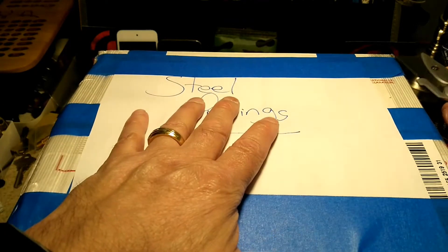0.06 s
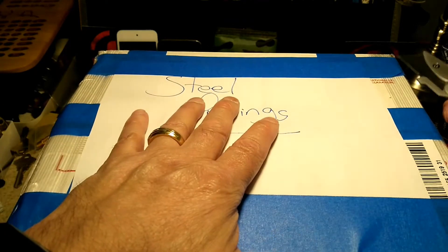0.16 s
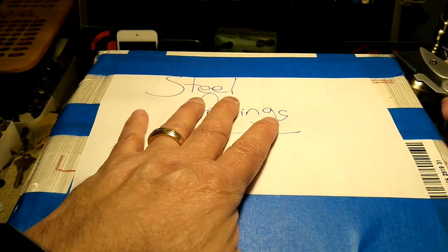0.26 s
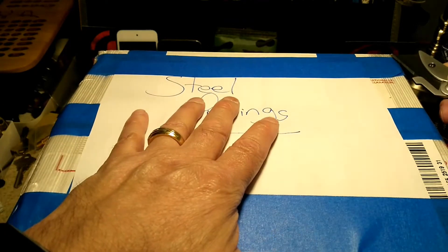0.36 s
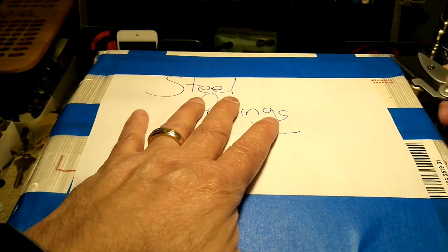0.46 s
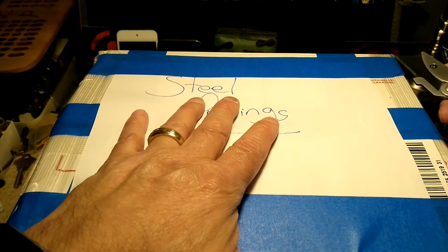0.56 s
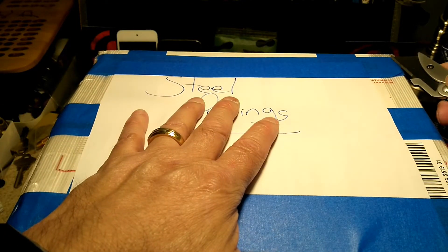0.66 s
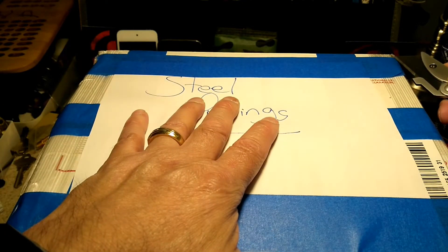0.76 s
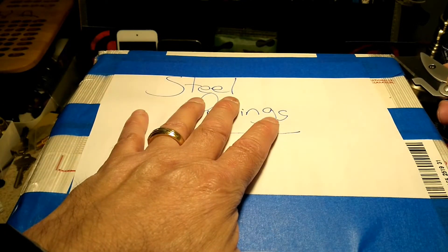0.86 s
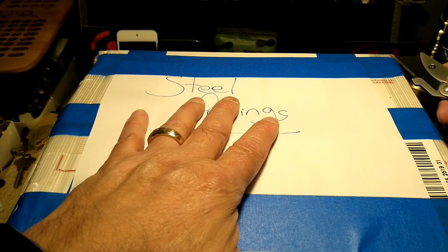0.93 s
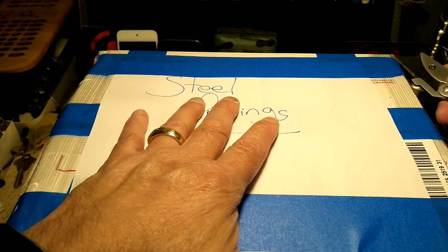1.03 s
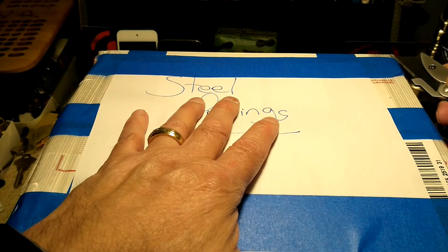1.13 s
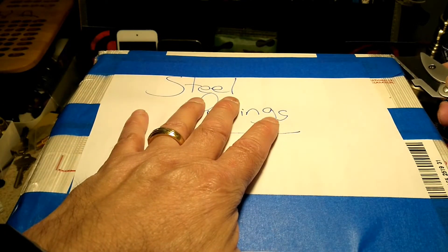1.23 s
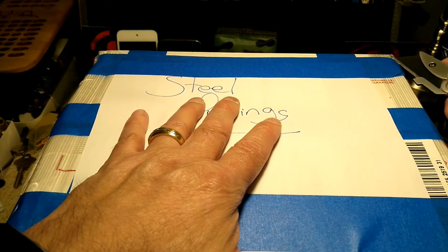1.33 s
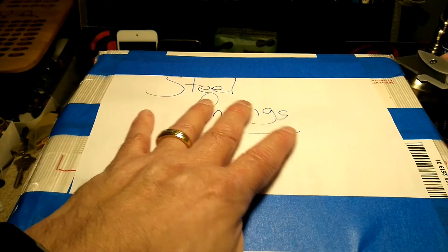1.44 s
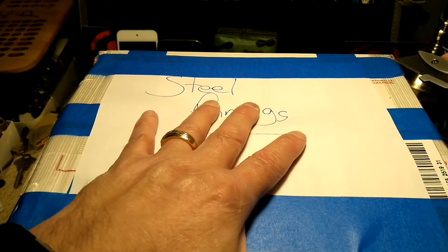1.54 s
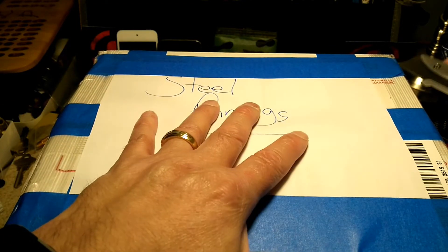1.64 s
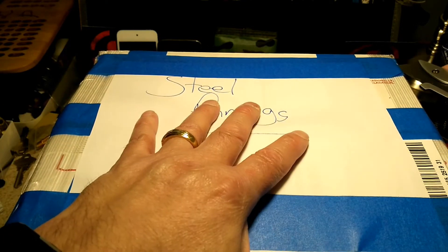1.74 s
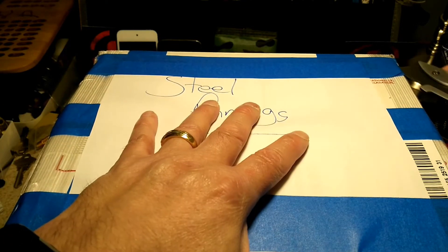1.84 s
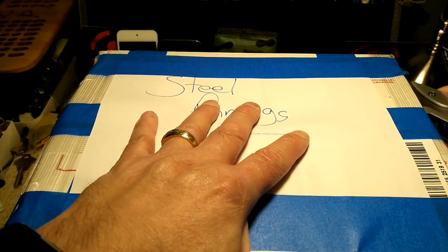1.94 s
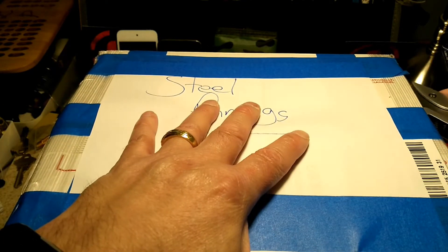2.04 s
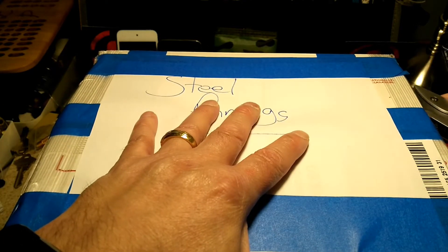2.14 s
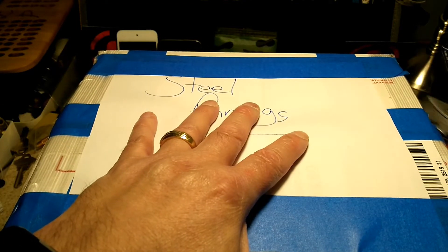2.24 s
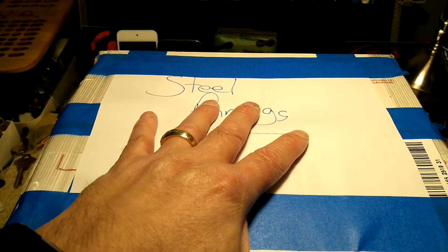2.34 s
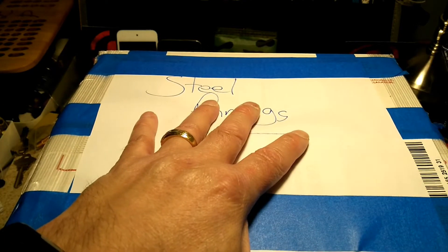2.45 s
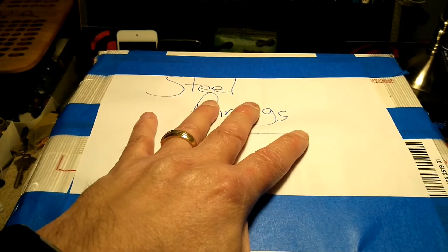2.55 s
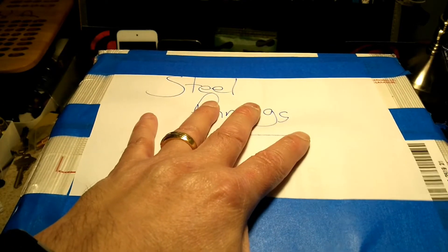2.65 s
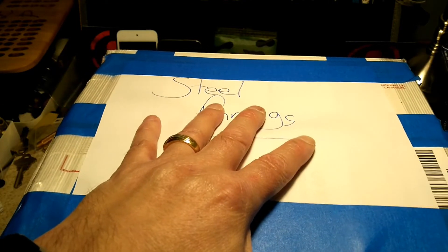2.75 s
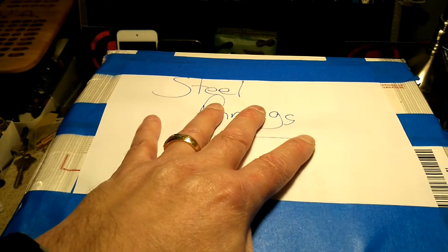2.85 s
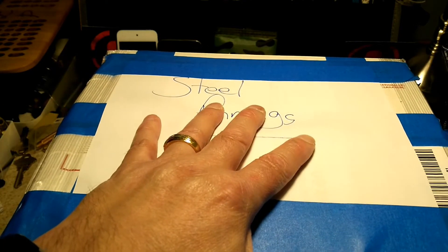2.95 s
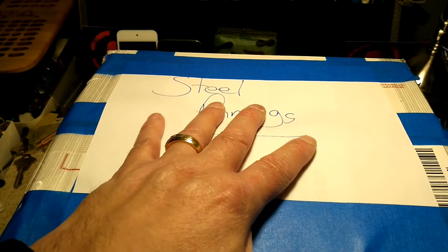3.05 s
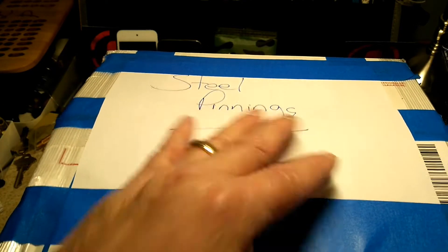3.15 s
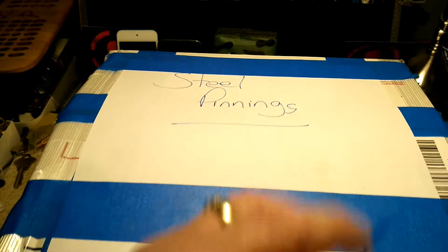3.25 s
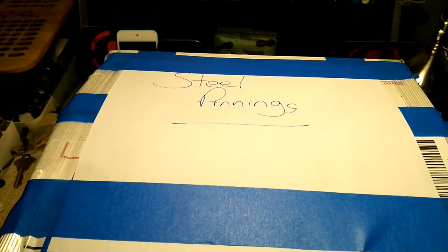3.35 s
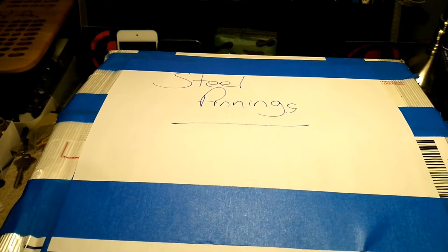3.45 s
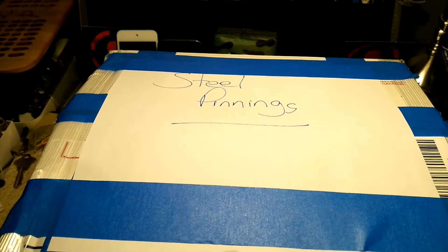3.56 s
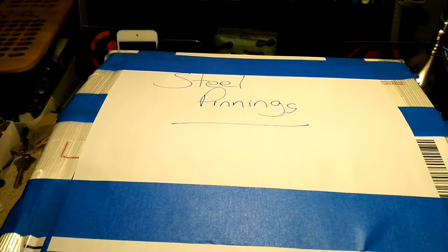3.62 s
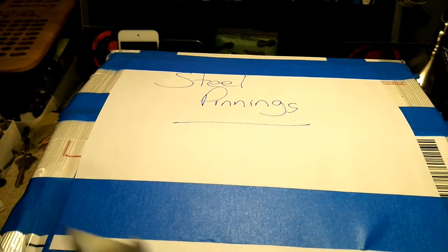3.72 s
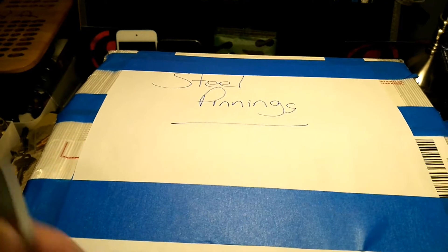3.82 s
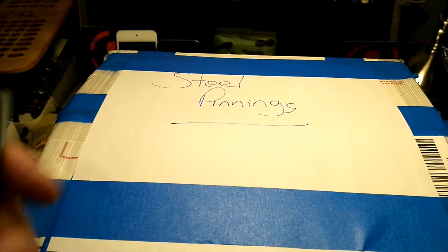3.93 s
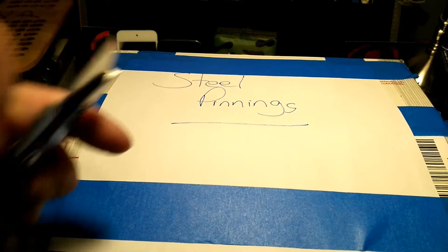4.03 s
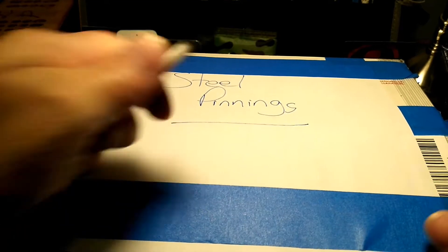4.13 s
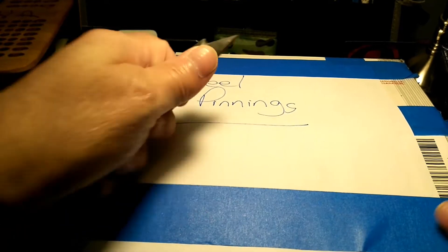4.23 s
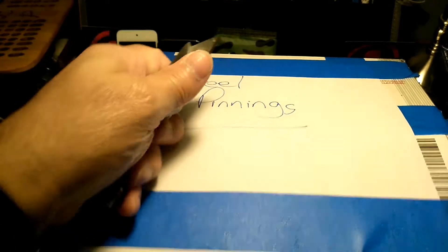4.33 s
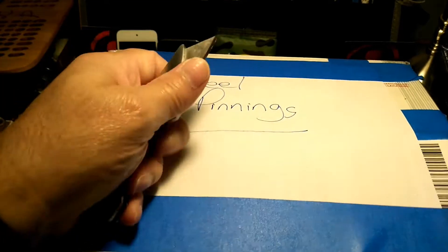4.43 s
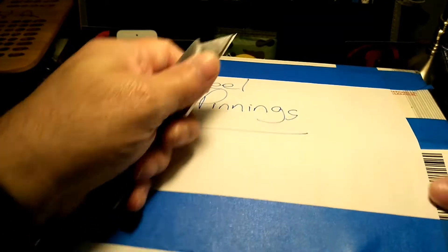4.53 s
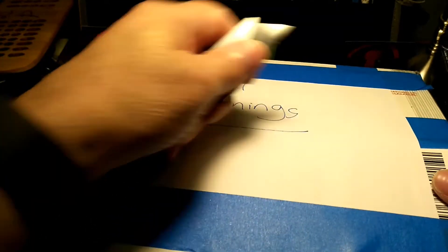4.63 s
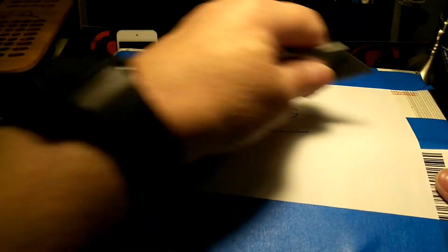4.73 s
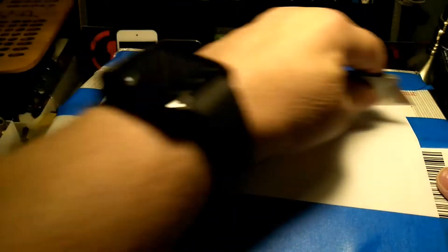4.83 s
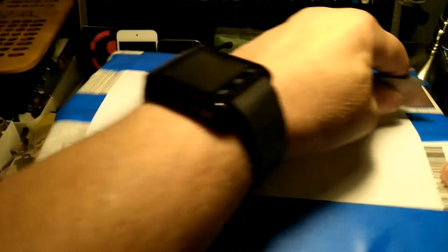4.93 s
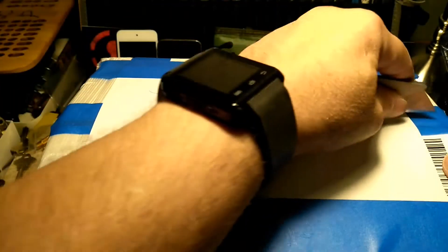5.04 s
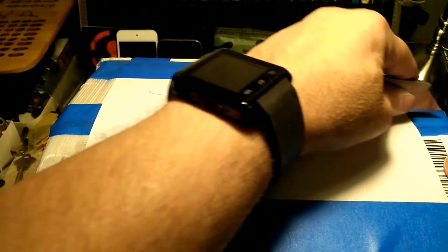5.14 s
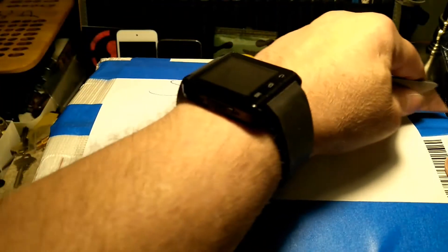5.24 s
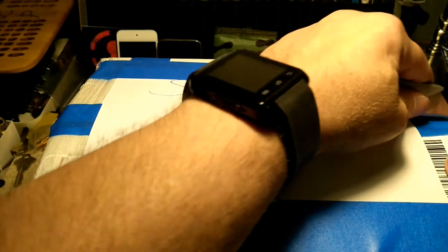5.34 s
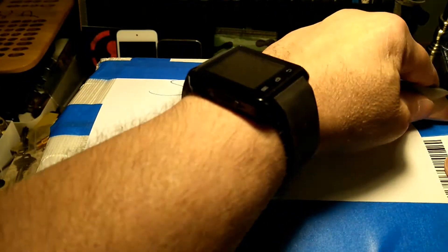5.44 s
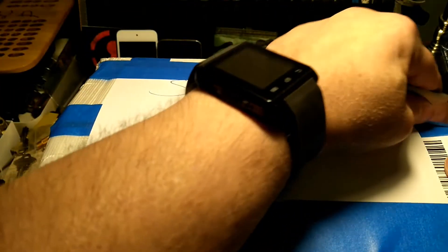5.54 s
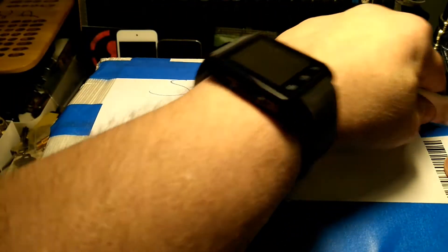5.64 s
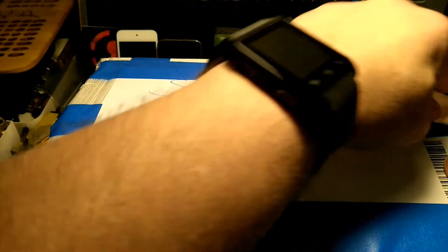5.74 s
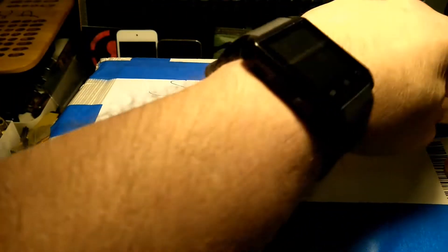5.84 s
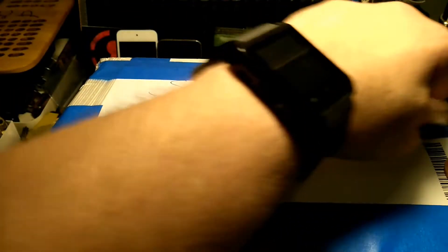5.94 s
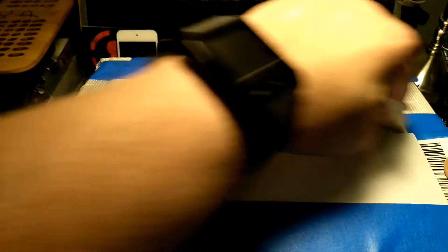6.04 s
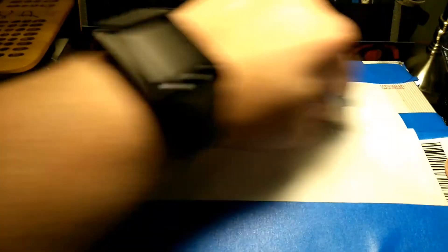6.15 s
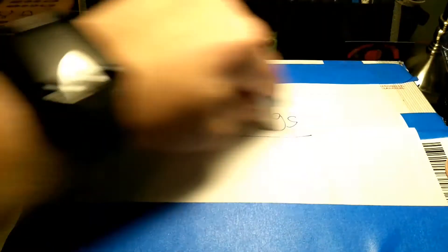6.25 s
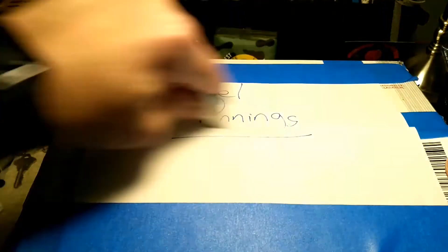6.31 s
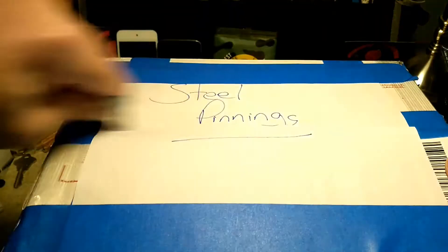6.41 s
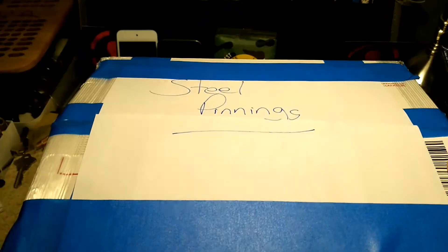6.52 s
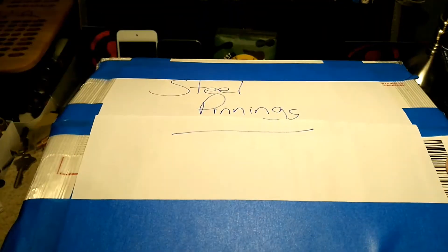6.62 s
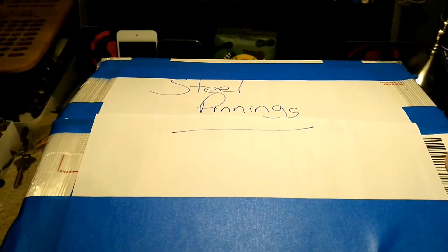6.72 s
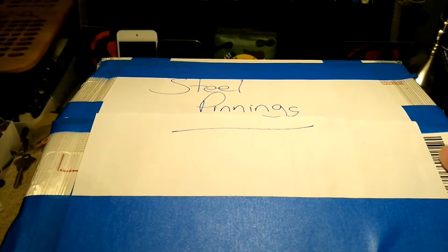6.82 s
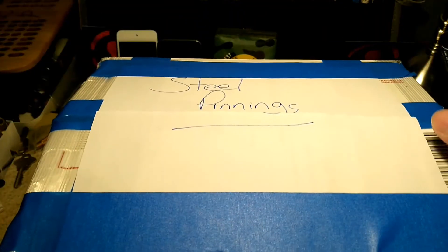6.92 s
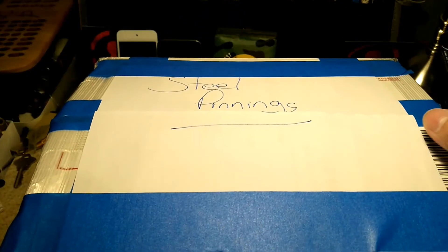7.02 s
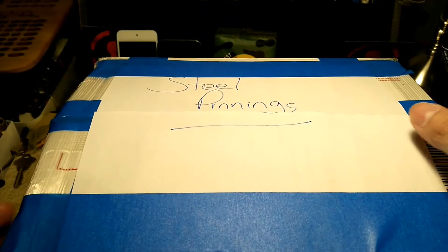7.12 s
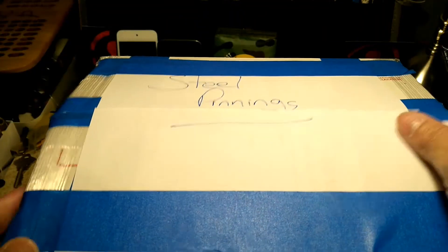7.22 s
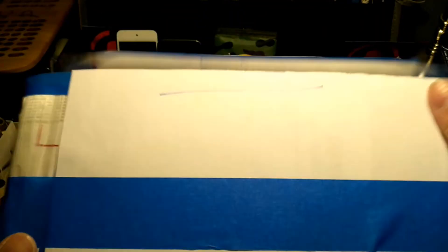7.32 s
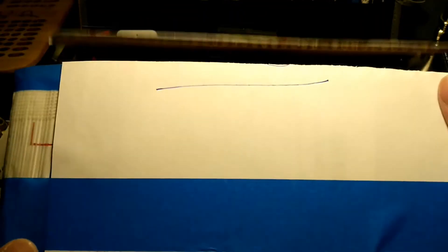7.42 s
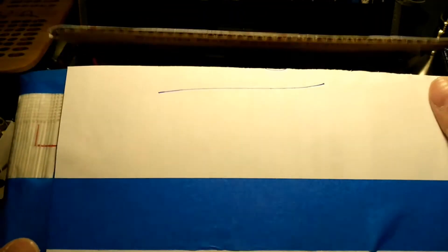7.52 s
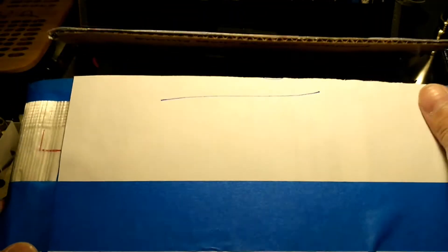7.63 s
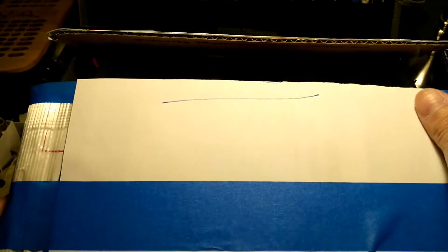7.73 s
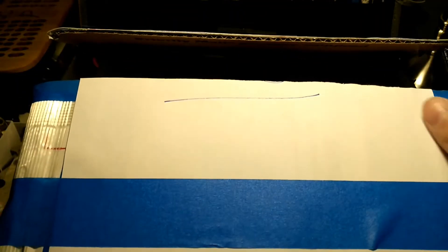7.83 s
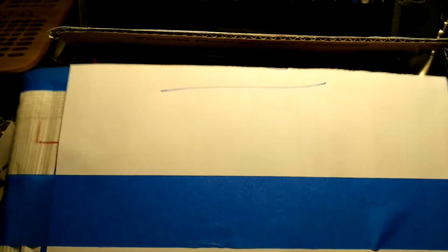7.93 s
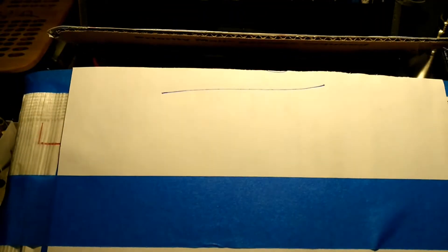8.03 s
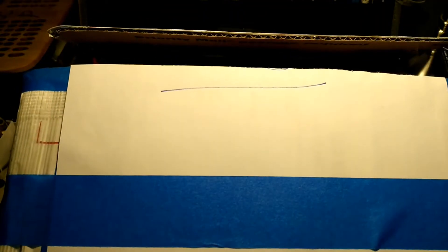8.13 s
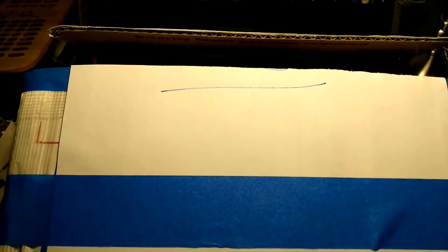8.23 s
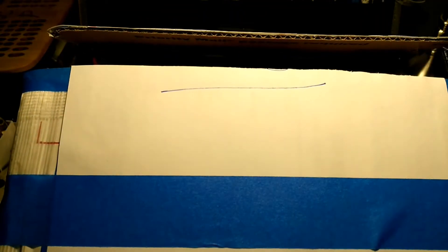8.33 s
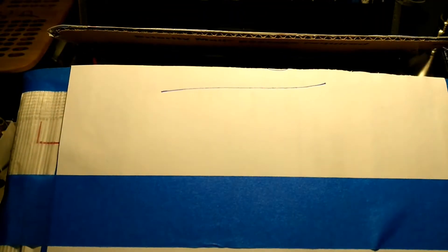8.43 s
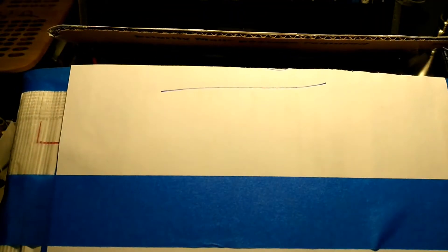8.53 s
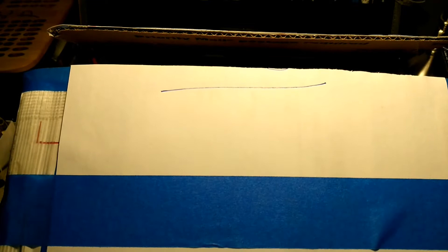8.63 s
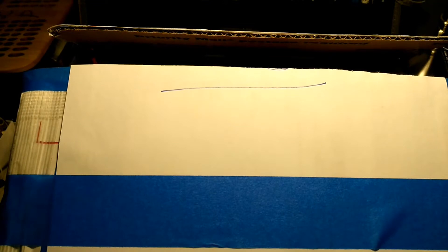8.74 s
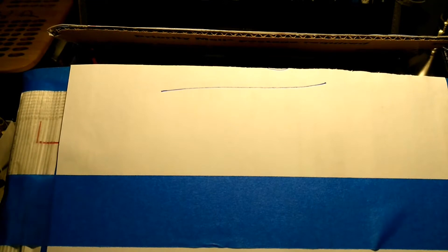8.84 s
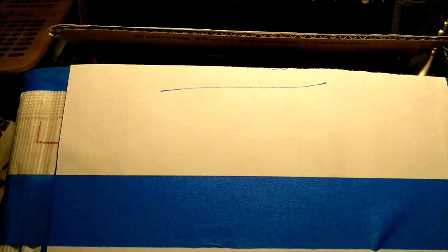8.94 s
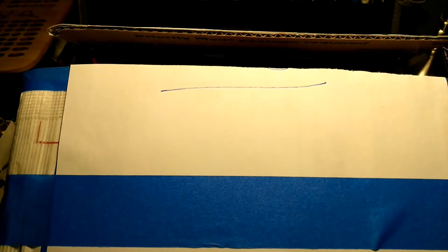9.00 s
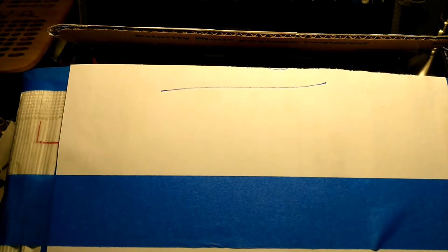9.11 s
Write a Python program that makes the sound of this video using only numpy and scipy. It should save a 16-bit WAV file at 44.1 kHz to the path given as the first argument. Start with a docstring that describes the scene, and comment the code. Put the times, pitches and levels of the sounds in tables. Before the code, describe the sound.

In a small room with a faint hum, a hand brushes, knocks and shoves a hollow cardboard box across a workbench. After a few light scratches, a knife pierces the packing tape and slits it in one short, crackling, rasping stroke. The flaps then pop open with a sharp knock, followed by a soft rumble and small ticks. Everything is very close, in stereo.

```python
"""A workbench in a small room, with a taped cardboard box close to two microphones.
Over a faint hum, a hand knocks, brushes and shoves the box. A knife pierces the tape and slits it
in one stroke, then the flaps pop open and one rumbles softly in the hand.
Rubbing and tearing are showers of tiny snaps; they and every knock set the hollow box ringing."""
import sys
import numpy as np
from scipy import signal
from scipy.fft import rfft, irfft
from scipy.io import wavfile
from scipy.ndimage import uniform_filter1d

SR = 44100
rng = np.random.default_rng(int(sys.argv[2]) if len(sys.argv) > 2 else 0)


def unload_audio(sound):
    """Save the sound as a 16-bit wav file, at the path given as the first command line argument."""
    columns = np.transpose(np.atleast_2d(sound))
    # keep every value between -1 and 1, then stretch to whole-number steps
    steps = np.round(np.clip(columns, -1, 1) * 32767)
    wavfile.write(sys.argv[1], SR, steps.astype(np.int16))


N = 404397
PIERCE_S, SLIT_S = 5.9645, 6.4  # the knife goes in; the tape lets go of the lid


def amp(db):
    """Turns decibels into a gain to multiply by."""
    return 10 ** (np.asarray(db) / 20)


def evened(x):
    """Scales a sound to an average power of 1."""
    return x / np.sqrt(np.mean(x ** 2) + 1e-20)


def unit(x):
    """Scales a sound to a total energy of 1 per channel."""
    return evened(x) / np.sqrt(x.shape[-1])


def read(points, hz):
    """Looks up a table by pitch, blending between its rows."""
    f, value = np.transpose(points)
    return np.interp(np.log(hz + 1), np.log(f + 1), value)


def seconds(size):
    """The time of each sample."""
    return np.arange(size) / SR


def progress(length_s):
    """Runs from 0 to 1 over the length of a sound."""
    return np.linspace(0, 1, round(length_s * SR))


def controls(rows):
    """Turns timed rows into a start time, a short fade at both ends and one curve per column."""
    times, *columns = np.transpose(rows)
    t = np.arange(times[0], times[-1], 1 / SR)
    fade = np.clip(np.minimum(t - t[0], t[-1] - t) / 0.00056, 0, 1)
    return times[0], fade, [np.interp(t, times, column) for column in columns]


def add(mix, start_s, sound):
    """Adds a sound to the stereo mix at its start time."""
    part = mix[:, max(round(start_s * SR), 0):][:, :sound.shape[-1]]
    part += sound[..., :part.shape[1]]


def panned(db):
    """Two gains that make the left side db louder than the right."""
    return amp(np.array([[.5], [-.5]]) * db)


def through(x, response):
    """Filters a sound with a response (how a thing answers one click), keeping its length."""
    return signal.fftconvolve(np.atleast_2d(x), np.atleast_2d(response), axes=1)[:, :x.shape[-1]]


def ring_out(drive, response):
    """Filters a sound and lets the ringing run to its end."""
    return signal.fftconvolve(drive, response[None], axes=1)


def colour(points, size=4096):
    """Builds a response from (f/Hz, level/dB) rows; only the balance between the rows counts."""
    log_gain = np.log(amp(read(points, abs(np.fft.fftfreq(size, 1 / SR)))))
    spectrum = np.exp(np.conj(signal.hilbert(log_gain)))  # nothing sounds ahead of the click
    return unit(np.fft.ifft(spectrum).real[:size // 2])


def resonance(hz, width_hz):
    """The response of something that rings around one pitch."""
    f = np.geomspace(40, 20000, 300)
    detune = (f / hz - hz / f) * hz / width_hz
    return colour(np.transpose([f, -20 * np.log10(1 + detune ** 2 / 2)]))


# How alike the two microphones hear each pitch: f/Hz, likeness (1 = the same)
LIKENESS = [(60, .96), (330, .96), (700, .8), (1300, .6), (2500, -.05), (5000, -.15), (12000, 0)]
def stereo_noise(size):
    """White noise at two microphones: alike in the bass, unrelated in the treble."""
    left, other = rfft(rng.standard_normal((2, size)))
    same = np.clip(read(LIKENESS, np.fft.rfftfreq(size, 1 / SR)), -1, 1)
    right = same * left + np.sqrt(1 - same ** 2) * other
    return irfft(np.array([left, right]), size)


def snap(decay_s, size=4096, swell=0):
    """A burst of noise that builds and dies; swell is its rise time as a share of the decay."""
    age = seconds(size) / max(decay_s, 1 / SR)
    rise = 1 - np.exp(-(age + 1e-3) / (swell + 1e-6))
    return unit(stereo_noise(size) * np.exp(-age) * rise)


def scrape(hz, width_hz, decay_s):
    """One short burst of noise rings one resonance; longer ones build up more gently."""
    return unit(through(snap(decay_s, size=8192, swell=0.98), resonance(hz, width_hz)))


def grains(size, per_s, spread_db, decay_s, spots=8):
    """A shower of tiny snaps of uneven strength, from several spots."""
    out = 0
    for _ in range(spots):
        strength = amp(spread_db * np.minimum(rng.exponential(1, size), 4))
        hits = rng.random(size) < per_s / spots / SR
        out = out + through(strength * hits, snap(decay_s, size=512))
    return evened(out)


def catches(size, depth_db, hold_s):
    """The wavering gain of a surface that catches and slips."""
    wander = signal.lfilter([1], [1, -np.exp(-1 / (SR * hold_s))], rng.standard_normal(size))
    return evened(amp(depth_db * np.clip(evened(wander), -2, 2)))


# Colour of the quiet room's noise: f/Hz, level/dB
AIR_COLOUR = [(25, -13), (48, -4), (70, -5.5), (92, -22.5), (125, -8), (180, -19), (250, -14), (500, -29.5),
              (600, -28.5), (900, -35), (1300, -39.5), (2600, -43), (6000, -55.5), (16000, -59)]
# Steady electrical tones: f/Hz, level/dB
HUM_TONES = [(59.5, -63), (119, -88), (241, -70), (291, -72.5), (606, -81.5), (7365, -103), (14729, -100)]
def background(air_db=-57.5):
    """Low room noise, mains hum and a thin electrical whine."""
    t = seconds(N)
    lag = np.array([[0], [0.035]])  # share of a cycle by which the right side trails
    hum = sum(amp(db) * np.sqrt(2) * np.sin(2 * np.pi * (hz * t + rng.random() - lag))
              for hz, db in HUM_TONES)
    return amp(air_db) * through(stereo_noise(N), colour(AIR_COLOUR)) + hum


# Small ticks, creaks and hollow taps, some perhaps lip smacks: t/s, base level/dB, f/Hz, decay/s
SMALL_SOUNDS = [(0.133, -67.5, 8750, 0.012), (1.286, -72.5, 8900, 0.0054), (1.463, -49, 1780, 0.0027),
                (1.588, -58, 1130, 0.04), (1.922, -31, 291, 0.0075), (2.422, -30.5, 231, 0.0082),
                (2.828, -56.5, 3350, 0.026), (2.854, -53, 11800, 0.014), (3.075, -58, 4180, 0.005),
                (3.178, -49.5, 4270, 0.013), (2.892, -55, 640, .004), (2.892, -58, 1280, 0.0037),
                (3.416, -61, 9000, 0.0025), (3.608, -61.5, 9500, 0.003), (4.028, -58, 1750, 0.012),
                (4.725, -52, 7900, 0.0025), (6.35, -31, 2370, 0.0018), (6.719, -69.5, 4300, 0.0021),
                (6.732, -65, 3900, 0.0046), (6.887, -68, 10200, .0015), (6.911, -72, 6000, .0012),
                (6.932, -58.5, 8100, 0.0015), (6.987, -65.5, 4400, 0.0027), (7.074, -64, 4100, 0.0045),
                (7.19, -48, 1095, 0.034), (7.269, -34.5, 4250, 0.0018), (7.535, -69.5, 7000, .002),
                (7.882, -45, 480, .004), (7.885, -45, 135, 0.0085), (7.912, -55.5, 850, 0.0043),
                (8.14, -69, 10500, .004), (8.56, -62.5, 1950, 0.0092), (8.613, -68.5, 4200, 0.0051),
                (8.658, -57, 2890, 0.012), (8.662, -57.5, 1390, 0.012), (8.992, -58, 2860, 0.014)]
def ticks(boost_db=26):
    """Each small sound rings one resonance, with a faint wide splash around it."""
    out = np.zeros((2, N))
    for start, db, hz, decay in SMALL_SOUNDS:
        width = hz * .29 * (hz / 3500) ** .3  # higher ticks are less pure
        splash = amp(-13) * scrape(hz, 5 * width, decay)
        add(out, start, amp(db + boost_db) * (scrape(hz, width, decay) + splash))
    return out


# The notes of the hollow box: f/Hz, relative level/dB, time to fade by 60 dB/s
BOX_NOTES = [(73.4, -23, 0.35), (137, -3, 0.12), (163.6, -18, 0.18), (226, -5.5, 0.016),
             (247.6, -1.5, 0.035), (293, -1, 0.021), (350, -2.5, 0.017), (367, -2.5, 0.054),
             (394, -16.5, 0.2), (469, -20.5, 0.13), (675, -11, 0.032), (788, -16.5, 0.18),
             (920, -23.5, 0.043), (1032, -23, 0.16), (1170, -24.5, 0.08), (1350, -19, 0.055)]
def box_ring(bass_db=-9, size=12000):
    """The box rings all its notes at once; tape holds the lowest back by bass_db (0 once slit)."""
    t = np.maximum(seconds(size) - np.array([[.00012], [0]]), 0)  # reaches the left a little late
    return unit(-sum(amp(db + bass_db * (hz < 150) - 60 * t / fade_s) * np.sin(2 * np.pi * hz * t)
                     for hz, db, fade_s in BOX_NOTES))


def lid_push(hz=350, decay_s=0.0026, size=12000):
    """The lid gives way once and springs back."""
    t = seconds(size)
    return unit(-np.sin(2 * np.pi * hz * t) * t * np.exp(-t / decay_s))


# Colours of cracking card and ticking tape: f/Hz, level/dB
CARD_COLOUR = [(200, -17.5), (450, -0.5), (600, -5), (720, -0.5), (920, -3.5), (1200, -1.5), (1550, -3),
               (1750, -5), (2300, -3.5), (2900, -10.5), (4300, -19), (7000, -49)]
TAPE_COLOUR = [(1500, -20), (3000, -1.5), (4300, -2), (6500, -8.5), (9000, -7.5), (12000, -13),
               (16000, -20.5)]
# Knocks on the box: t/s, base level/dB, weight/dB, decay/s
BOX_KNOCKS = [(0.671, -65, -1, 0.0047), (1.446, -52, -13, 0.0074), (1.6572, -41, -2, 0.0035),
              (1.668, -41.5, 3, 0.0037), (1.849, -45, -6.5, 0.0055), (1.889, -30.5, -1.5, 0.0094),
              (1.923, -40.5, 18.5, 0.0019), (1.928, -46, -7, 0.0015), (1.963, -57, -15.5, 0.0043),
              (2.191, -44, 1.5, 0.0057), (2.217, -41.5, 0, 0.0073), (2.204, -49.5, -9, 0.0023),
              (2.2816, -41.5, 5.5, 0.0031), (2.3185, -44.5, 18.5, 0.0025), (2.332, -46.5, -12, .006),
              (2.379, -44, 12, 0.0025), (2.4201, -44, 9, 0.0063), (3.745, -64, -3, .007),
              (5.9645, -32, -11, .0012), (4.283, -55, -9.5, 0.015), (4.3484, -79, 36, 0.0035),
              (4.357, -78.5, 44.5, 0.0045), (4.384, -63, -22.5, 0.0022), (4.401, -56.5, -16.5, 0.0043),
              (4.54, -53.5, -1.5, 0.0068), (4.973, -52.5, 0.5, 0.0065), (5.956, -42, -6, 0.0048),
              (5.9707, -36.5, -4, 0.00095), (5.977, -34, -8.5, 0.00089), (6.034, -40.5, -0.5, 0.0011),
              (6.0853, -41.5, -3, 0.0016), (6.0996, -36.5, -14.5, 0.0012), (6.1181, -32, -1.5, 0.0016),
              (6.1783, -34, 0, 0.0021), (6.25, -31, -1.5, 0.0034), (6.311, -31, 5.5, 0.0025),
              (6.3487, -32.5, 3.5, 0.0013), (6.4778, -30.5, 1, 0.0061), (6.499, -38.5, 7, 0.0022),
              (7.076, -61.5, -8, 0.0023), (7.2391, -37, 2.5, 0.0041), (7.249, -31.5, -0.5, 0.0013),
              (7.253, -33.5, 3.5, 0.0032), (7.2665, -28.5, 5, 0.0015), (7.2901, -19, 6.5, 0.0036),
              (7.2984, -28, 4, 0.002), (7.805, -60.5, -13, 0.0027), (7.883, -49.5, -1.5, 0.0029)]
def knocks(thump_db=22, boom_db=19, wall_db=17, crack_db=26, tick_db=20):
    """Each knock cracks the card; heavy ones thump the box and its walls, light ones tick the tape."""
    out = np.zeros((2, N))
    card, tape = colour(CARD_COLOUR), colour(TAPE_COLOUR)
    give = amp(-8) * lid_push()
    shut, slit = box_ring(bass_db=-13.5) + give, box_ring(bass_db=0) + give
    for start, db, weight, decay in BOX_KNOCKS:
        add(out, start, amp(db + weight + thump_db) * (shut if start < SLIT_S else slit))
        if start < PIERCE_S:  # the sealed box also booms like a drum
            add(out, start, amp(db + weight + boom_db) * scrape(hz=220, width_hz=130, decay_s=0.005))
        walls = scrape(hz=448.6, width_hz=1800, decay_s=0.0071)
        add(out, start, amp(db + 0.45 * weight + wall_db) * walls)
        add(out, start, amp(db + crack_db) * through(snap(decay, swell=0.81), card))
        tick = through(snap(decay, swell=0.99), tape)
        add(out, start, amp(db - 0.86 * weight + tick_db) * panned(7.5) * tick)
    return out


# Colour of skin sliding on paper: f/Hz, level/dB
SKIN_COLOUR = [(150, 5), (300, -3), (800, 7.5), (1500, 6), (3000, 4.5), (4500, 0.5), (6000, -1), (9000, 3),
               (13000, -1.5), (16000, -20.5)]
# Skin and sleeve touch the lid: t/s, length/s, sliding level/dB, pressing level/dB
TOUCHES = [(3.03, .26, -58, -60), (3.66, .4, -74, -74), (1.32, .2, -71, -66), (1.48, .36, -76, -65),
           (4.1, .2, -72, -68), (4.255, .09, -63, -52), (4.29, .21, -59, -54), (4.45, .2, -57, -56),
           (4.58, .27, -65, -66), (4.8, .45, -70, -60), (6.84, .24, -77, -59), (7.15, .18, -59, -53),
           (7.2, .33, -59, -54), (7.45, .3, -82, -59), (7.68, .32, -68.5, -57)]
def brushes(crinkle_db=-7, box_db=-3, rumble_db=-2):
    """Skin slides on paper, crinkles the tape, stirs the box and rumbles in its walls."""
    touch = np.zeros((2, N))
    for start, length, slide_db, press_db in TOUCHES:
        swell = abs(np.sin(np.pi * progress(length))) ** 1.5
        add(touch, start, amp([[slide_db], [press_db]]) * swell)
    sliding, pressing = touch
    slips = grains(N, per_s=3800, spread_db=9.5, decay_s=0.0032, spots=5)
    crinkles = grains(N, per_s=260, spread_db=1, decay_s=0.0022, spots=3)
    skin = through(slips * sliding, colour(SKIN_COLOUR))
    tape = amp(crinkle_db) * through(crinkles * sliding, colour(TAPE_COLOUR))
    stir = slips[:1] * pressing
    walls = colour([(25, -7.5), (50, -1.5), (75, 17), (130, -5.5), (300, 7), (900, -36.5)])
    return skin + tape + amp(box_db) * through(stir, box_ring()) + amp(rumble_db) * through(stir, walls)


def box_drone(drive, bass_db=-9):
    """The whole box rings as one, wherever it is rubbed or tugged."""
    return signal.fftconvolve(drive[:1], box_ring(bass_db), axes=1)


# Colours of card rubbing and hissing on the bench: f/Hz, level/dB
RUB_COLOUR = [(250, -2), (550, -7), (850, 8), (1400, 3), (2000, -1), (3200, -5), (5500, -16)]
HISS_COLOUR = [(1500, -6.5), (3000, 1), (4500, -1), (6500, -9), (9500, -1.5), (13000, -8), (16000, -15)]
# Slides of the box: t/s, length/s, rub level/dB, weight/dB, hiss above the rub/dB
SLIDES = [(1.39, 0.19, -71, 15, 16), (1.818, 0.2, -45, 3, -16), (2.114, 0.34, -52.5, 8.5, -3),
          (2.28, 0.12, -44, 11.5, 0.5), (2.389, 0.42, -49, 3.5, -1), (2.503, 0.16, -50, 4, -9)]
def shoves(rise_s=0.054, fall_s=0.13, slowing_db_per_s=25):
    """Card drags over the bench: gritty rubbing that starts, slows and stops as the box drones along."""
    out = np.zeros((2, N))
    for start, length, db, weight, hiss_db in SLIDES:
        t = seconds(round(length * SR))
        ramp = np.clip(np.minimum(t / rise_s, (length - t) / fall_s), 0, 1)
        speed = np.sin(np.pi / 2 * ramp) ** 3 * amp(-slowing_db_per_s * t)
        grit = grains(SR, per_s=3500, spread_db=2, decay_s=0.00048)
        grit *= catches(SR, depth_db=-1.5, hold_s=0.0049)
        grit = amp(db) * speed * grit[:, :len(t)]
        add(out, start, box_drone(grit * amp(weight - 1 - t)))  # fades 1 dB a second faster
        add(out, start, ring_out(grit, colour(RUB_COLOUR)))
        add(out, start, ring_out(grit * amp(hiss_db), colour(HISS_COLOUR)))
    return out


def gliding(x, hz, width_hz):
    """A resonance that follows the curve hz: shift that pitch down to zero, smooth, shift back."""
    turn = np.exp(2j * np.pi * np.cumsum(hz) / SR)
    memory = np.exp(-np.pi * width_hz / SR)
    x = x / turn
    for _ in range(2):
        x = signal.lfilter([1 - memory], [1, -memory], x)
    return (x * turn).real


# Card or tape judders as it drags: t/s, length/s, level/dB, start f/Hz, end f/Hz, width/Hz
DRAGS = [(2.279, 0.071, -40.5, 115, 75, 70), (2.33, 0.033, -51, 3370, 3340, 500),
         (2.52, .12, -49, 267, 220, 131), (2.525, .1, -50.5, 880, 820, 170),
         (2.556, 0.084, -61, 1040, 1070, 130), (4.274, 0.058, -45, 129, 55, 60),
         (4.27, .16, -54, 210, 200, 70), (4.715, 0.034, -60.5, 4200, 3600, 3500),
         (6.099, 0.18, -34.5, 274, 257, 120), (6.172, 0.18, -40.5, 70.4, 75, 50),
         (6.246, 0.046, -41.5, 1174, 1160, 60), (6.25, .05, -42, 2420, 2380, 80),
         (6.261, .06, -25.5, 380, 330, 45), (6.338, 0.024, -35, 960, 806, 350),
         (6.334, .07, -36.5, 2445, 2340, 110), (6.355, 0.058, -34, 4987, 4770, 1200),
         (6.367, .065, -29, 380, 310, 45), (6.399, .125, -29.5, 118, 140, 44.9),
         (6.406, .045, -32, 765, 832, 120), (6.406, 0.07, -28, 4705, 5140, 1594),
         (6.413, 0.052, -32, 9360, 8370, 3480), (6.46, .035, -29.5, 870, 930, 150),
         (6.468, 0.047, -25.5, 375, 350, 44.9), (6.489, 0.046, -33, 85, 55.3, 34.95),
         (7.293, 0.039, -29, 370, 320, 140.3), (7.711, .08, -72.5, 2830, 2860, 400),
         (7.859, 0.023, -61, 750, 650, 301)]
def judders(lead_in=2000):
    """Rough slips keep one resonance going; it glides as the strain and the free length change."""
    out = np.zeros((2, N))
    for start, length, db, start_hz, end_hz, width in DRAGS:
        along = progress(length)
        hz = np.pad(start_hz + (end_hz - start_hz) * along, (lead_in, 0), "edge")
        slips = stereo_noise(len(hz)) * catches(len(hz), depth_db=3.5, hold_s=.0012)
        ring = gliding(slips, hz, width)[:, lead_in:]
        swell = abs(np.sin(np.pi * along)) ** 0.54
        add(out, start, amp(db) * evened(ring * swell))
    return out


# The card buckles: t/s, level/dB, start f/Hz, end f/Hz, length/s
BUCKLES = [(2.2825, -33, 1600, 230, .009), (2.3795, -27.5, 1150, 200, .013), (2.4045, -36, 750, 200, .01),
           (2.42, -24.5, 950, 170, .009), (5.9645, -24, 2600, 600, .0035), (6.4965, -20, 1400, 400, .006),
           (6.501, -17, 380, 320, .015), (7.2675, -20, 2200, 300, .004), (7.2905, -15, 2600, 400, .003)]
def pops():
    """Stiff card carries high notes faster than low ones, so each pop is a quick falling chirp."""
    out = np.zeros((2, N))
    for start, db, start_hz, end_hz, length in BUCKLES:
        fall = progress(length) ** .75  # the pitch falls fastest at first
        uneven = catches(len(fall), depth_db=1.5, hold_s=.001)
        hz = uneven * start_hz * (end_hz / start_hz) ** fall
        chirp = np.sin(2 * np.pi * np.cumsum(hz) / SR)
        add(out, start, amp(db) * chirp * np.sqrt(abs(np.sin(np.pi * fall))))
    return out


# Colour of scratched tape: f/Hz, level/dB
SCRATCH_COLOUR = [(4500, -7), (5900, -13), (6700, -1), (8500, -0.5), (11000, -6), (15000, -30)]
# Scratches along the seam: t/s, length/s, level/dB
SEAM_SCRATCHES = [(4.688, .04, -57), (4.715, .03, -54.5), (5.125, .07, -71), (5.225, .07, -68),
                  (5.368, .05, -64.5), (6.71, .04, -70), (6.8, .07, -66)]
def scratches():
    """The blade point or a fingernail feels along the tape: short swells of fine, dry grit."""
    out = np.zeros((2, N))
    for start, length, db in SEAM_SCRATCHES:
        swell = np.sin(np.pi * progress(length))
        grit = grains(SR // 4, per_s=1300, spread_db=0.5, decay_s=0.00046)[:, :len(swell)]
        add(out, start, ring_out(amp(db) * swell * grit, colour(SCRATCH_COLOUR)))
    return out


def patchy(x, depth_db):
    """Each stretch of tape rings differently, so small bands of pitch quickly come and go."""
    bands = signal.stft(x, SR, nperseg=512, noverlap=384)[2]
    patches = rng.standard_normal(bands.shape[1:])
    patches = uniform_filter1d(uniform_filter1d(patches, 5, axis=0), 5, axis=1)
    varied = signal.istft(bands * amp(depth_db * evened(patches)), SR, nperseg=512, noverlap=384)[1]
    return evened(varied[:, :x.shape[1]])


def snapping_fibres(fade, near_s=0.00047, far_s=.0021):
    """Fine fibres give way in quick bunches under the blade; thick ones crack singly."""
    t = seconds(len(fade))
    fine = grains(len(t), per_s=2600, spread_db=0.5, decay_s=0.00099, spots=12)
    # each snap comes back from the edge of the lid, later as the blade moves away
    lag = np.linspace(near_s, far_s, len(t))
    echo = np.array([np.interp(t - lag, t, side) for side in fine])
    fine = fade * evened(fine + .33 * echo)
    cracks = fade * grains(len(t), per_s=170, spread_db=3, decay_s=0.0004, spots=6)
    bunches = catches(len(t), depth_db=1.5, hold_s=0.002)
    return fade * patchy(fine * bunches + .3 * cracks, depth_db=2.3)


# Colours of the rasping lid, the crackle of taut tape and tearing tape: f/Hz, level/dB
RASP_COLOUR = [(450, -39.5), (570, -28.5), (650, 6.5), (800, 3.5), (910, 6), (990, -2), (1040, 5),
               (1090, -3), (1185, 10), (1300, 2.5), (2000, -26)]
CRACKLE_COLOUR = [(900, -30), (1450, 6.5), (1700, 4), (2100, 1), (2420, 3), (2900, -1), (3500, -3),
                  (5000, -30)]
TEAR_COLOUR = [(1800, -10), (3000, 2.5), (4000, 3), (5000, 0.5), (6500, -5.5), (9000, -6), (12000, -12.5),
               (16000, -16.5)]
# The cut: t/s, cutting level/dB, tug level/dB, tear left minus right/dB, crackle above cutting/dB
KNIFE_STROKE = [(5.972, -27.5, -39.5, 15.5, -4.5), (5.995, -42, -33, 1, -1.5), (6.04, -38.5, -36, 4, -6),
                (6.075, -42.5, -42.5, 9.5, -10), (6.088, -36.5, -32, 7.5, -2.5),
                (6.16, -34.5, -31.5, 2.5, -1.5), (6.2, -30, -28.5, -4.5, -2.5),
                (6.235, -28.5, -24.5, -3.5, -1.5), (6.285, -32, -25, 6.5, -1), (6.33, -31.5, -27.5, 1.5, 4),
                (6.352, -28.5, -27, 2, -1.5), (6.405, -29, -29.5, -1, -4.5),
                (6.428, -26.5, -29.5, -4, -7.5), (6.462, -28.5, -27, -1, -6.5),
                (6.482, -28.5, -27.5, -3.5, -6.5), (6.505, -40, -30, 3, -6)]
def knife(box_db=-4, lid_db=-7, rasp_db=-6, tear_db=-1, rasp_db_per_s=10):
    """The blade pierces the tape, then snaps fibre after fibre of tape and card, and tugs at the lid."""
    out = np.zeros((2, N))
    add(out, PIERCE_S, scrape(hz=1717.5, width_hz=199, decay_s=0))  # one click rings the taut tape
    start, fade, (cut_db, tug_db, side_db, taut_db) = controls(KNIFE_STROKE)
    t = seconds(len(fade))
    fibres = amp(cut_db) * snapping_fibres(fade)
    # the tugs are too quick to stir the deepest notes of the box
    tugs = fade * grains(len(t), per_s=2500, spread_db=3, decay_s=0.00024)
    bass_cut = signal.butter(2, 190, "highpass", fs=SR, output="sos")
    tugs = signal.sosfilt(bass_cut, tugs) * amp(tug_db + box_db)
    freed = np.clip((start + t - SLIT_S) / .05 + .5, 0, 1)
    add(out, start, box_drone(tugs * (1 - freed)) + box_drone(tugs * freed, bass_db=0))
    # the lid hums under the dragging blade, and rasps more as the slit grows
    drag = fade * amp(tug_db + lid_db) * rng.standard_normal((1, len(t)))
    add(out, start, ring_out(drag, resonance(hz=331, width_hz=68)))
    rasp = fibres * amp(rasp_db + rasp_db_per_s * (t - t.mean()))
    add(out, start, ring_out(rasp, colour(RASP_COLOUR)))
    add(out, start, ring_out(fibres * amp(taut_db), colour(CRACKLE_COLOUR)))
    add(out, start, ring_out(fibres * amp(tear_db) * panned(side_db), colour(TEAR_COLOUR)))
    return out


# The blade sticks in the cut: t/s, level/dB, start f/Hz, end f/Hz, length/s
BLADE_SQUEAKS = [(6.2168, -16.5, 2090, 4170, .0045), (6.2245, -21, 2100, 4000, .0035),
                 (6.2332, -14, 1500, 3900, .0025)]
def squeaks():
    """The stuck blade slips faster and faster as it breaks free, so each squeak rises."""
    out = np.zeros((2, N))
    for start, db, start_hz, end_hz, length in BLADE_SQUEAKS:
        rise = np.sqrt(progress(length))
        hz = start_hz + (end_hz - start_hz) * rise
        tone = np.sin(2 * np.pi * np.cumsum(hz) / SR)
        add(out, start, amp(db) * tone * np.sin(np.pi * rise))
    return out


# Fingers hold the lifted flap: t/s, level/dB
FLAP_HOLD = [(7.33, -56), (7.8, -55), (8.45, -55), (8.8, -62)]
def flap_rumble():
    """The raised flap trembles in the hand: a soft, deep rumble."""
    out = np.zeros((2, N))
    start, fade, (db,) = controls(FLAP_HOLD)
    tremble = fade * amp(db) * rng.standard_normal((1, len(fade)))
    add(out, start, ring_out(tremble, resonance(hz=64, width_hz=40)))
    return out


# Colour of the echo, its middle soaked up by furniture: f/Hz, level/dB
ECHO_COLOUR = [(100, -2), (300, -2.5), (650, -5), (1500, -3.5), (4000, -1), (12000, 0)]
# How long the echo lasts: f/Hz, time to fade by 60 dB/s
ECHO_FADE = [(100, .28), (300, .22), (800, .23), (2000, .24), (5000, .235), (13000, .22)]
def room(x, echo_db, size=20000, dip_hz=100):
    """A small room partly cancels one bass pitch and adds an echo, each band dying at its own speed."""
    notched = signal.lfilter(*signal.iirnotch(dip_hz, Q=5.3, fs=SR), x)
    x = x + 0.72 * (notched - x)
    onset = np.clip((seconds(size) - .003) / 0.0051, 0, 1)
    hz, t, bands = signal.stft(stereo_noise(size) * onset, SR, nperseg=256)
    tail_db = read(ECHO_COLOUR, hz)[:, None] - 60 * t / read(ECHO_FADE, hz)[:, None]
    tail = signal.istft(bands * amp(tail_db), SR, nperseg=256)[1]
    return x + amp(echo_db) * through(x, unit(tail))


def scene():
    """All the sounds in the room; the cut and the judders face the microphones and have less echo."""
    handling = knocks() + pops() + ticks() + scratches() + shoves() + brushes() + flap_rumble()
    handling = room(handling, echo_db=-7.5)
    cutting = room(knife() + squeaks() + judders(), echo_db=-17)
    return handling + cutting + background()


# How the two microphones differ: f/Hz, left minus right level/dB
MIC_BALANCE = [(100, 0), (1200, .8), (2500, 0), (4400, -4), (8000, 4), (15000, 5)]
def record(dry, low_hz=48, high_hz=15900):
    """The microphones lose the deepest bass and highest treble, and each colours the sound its own way."""
    dry = signal.sosfilt(signal.butter(5, low_hz, "highpass", fs=SR, output="sos"), dry)
    balance = panned(read(MIC_BALANCE, np.fft.rfftfreq(N, 1 / SR)))
    heard = irfft(rfft(dry) * balance, N)
    treble_cut = signal.firwin(511, high_hz, window=("kaiser", 9), fs=SR)
    return signal.oaconvolve(heard, treble_cut[None], "same")


dry = scene()
out = record(dry)
unload_audio(out)
```